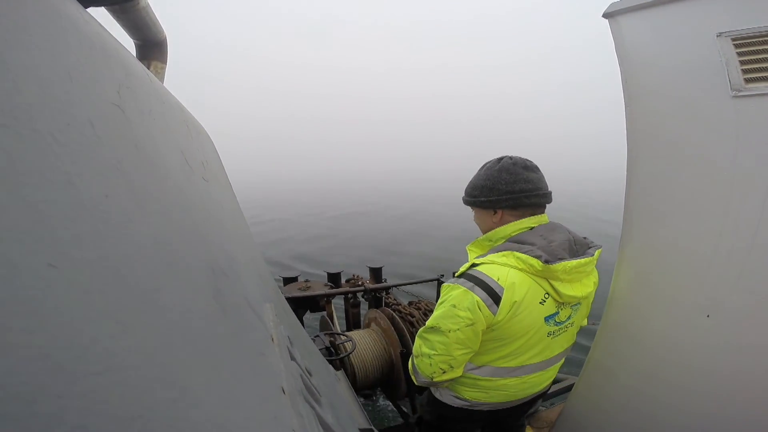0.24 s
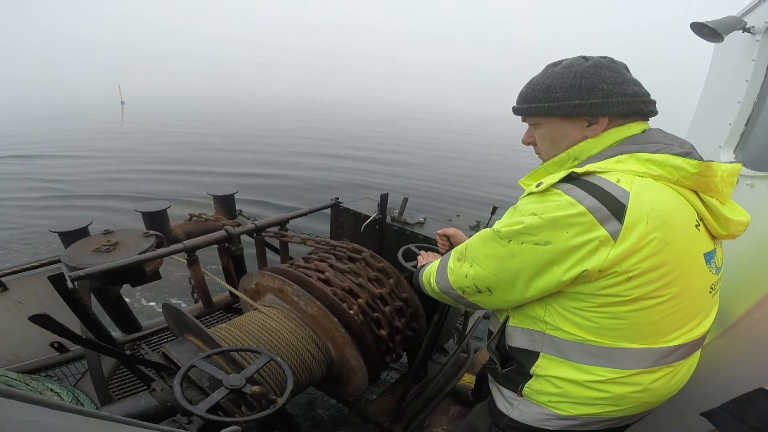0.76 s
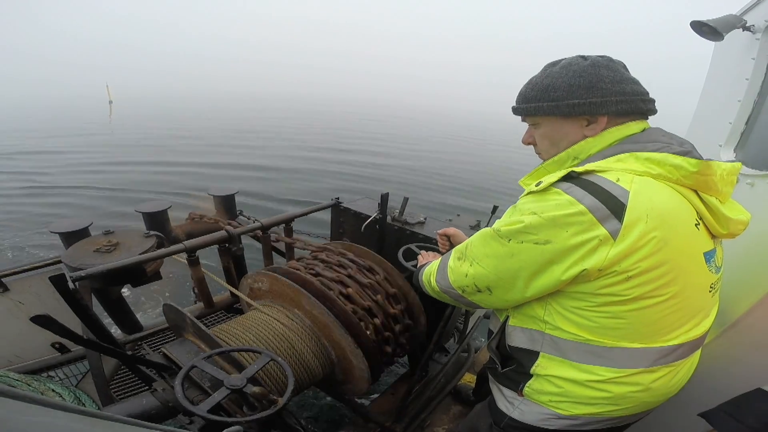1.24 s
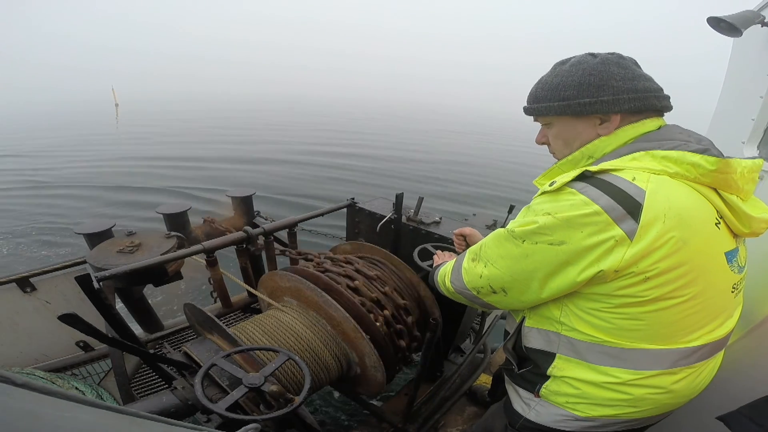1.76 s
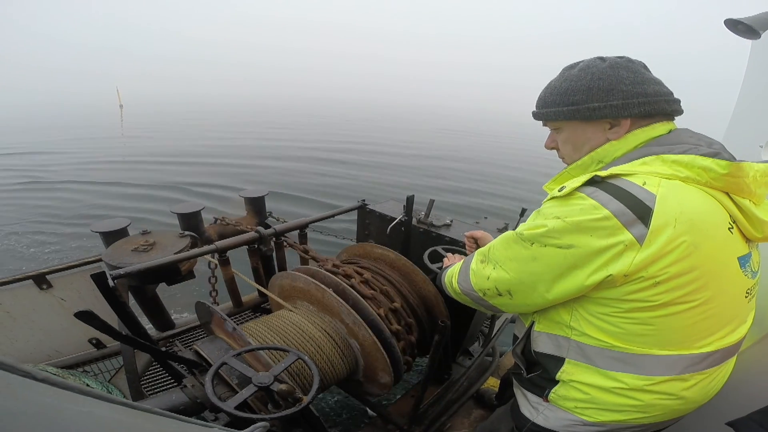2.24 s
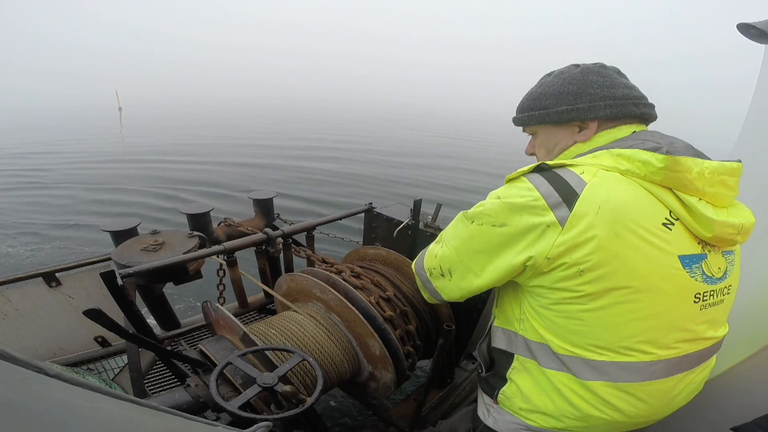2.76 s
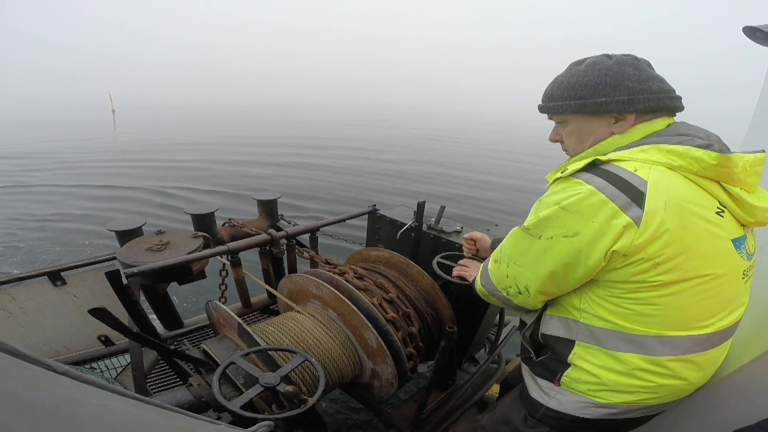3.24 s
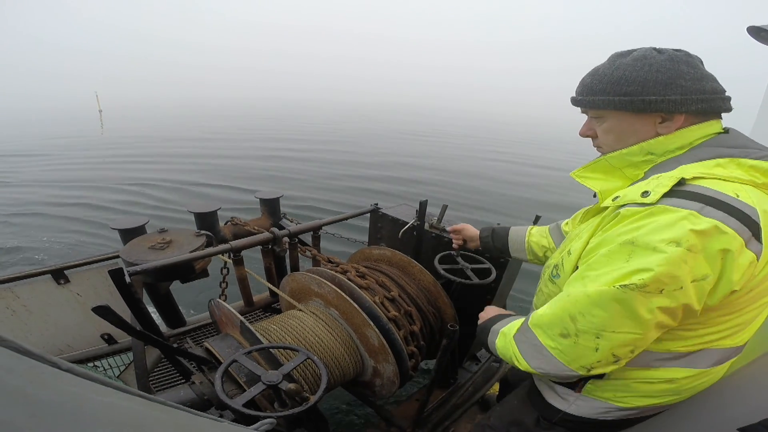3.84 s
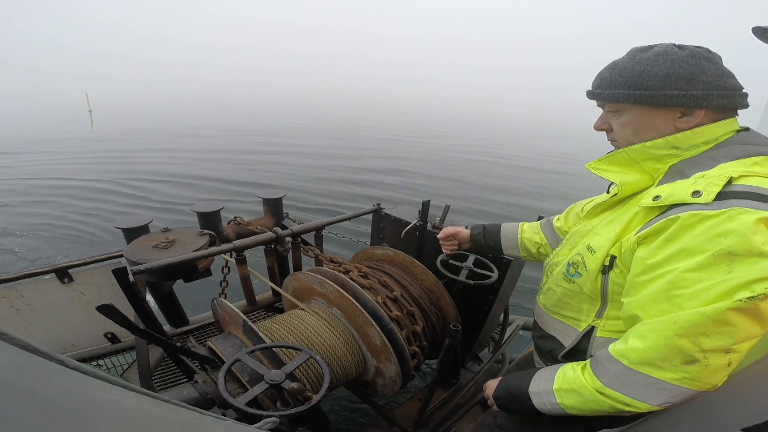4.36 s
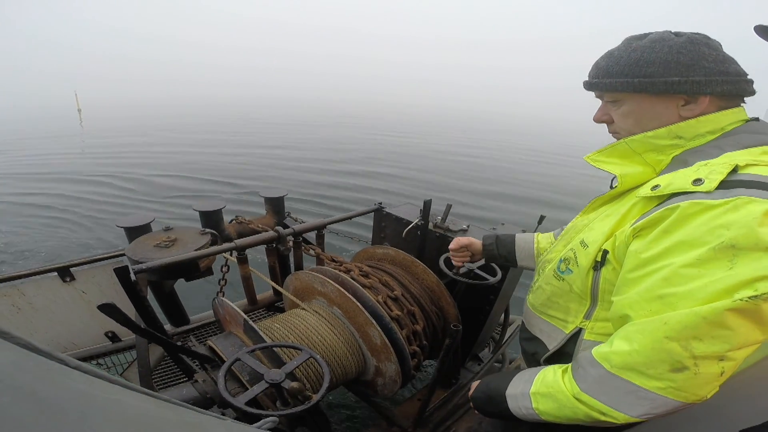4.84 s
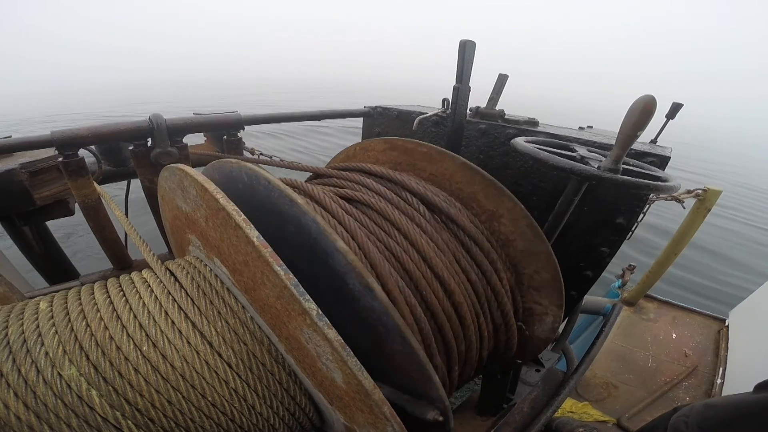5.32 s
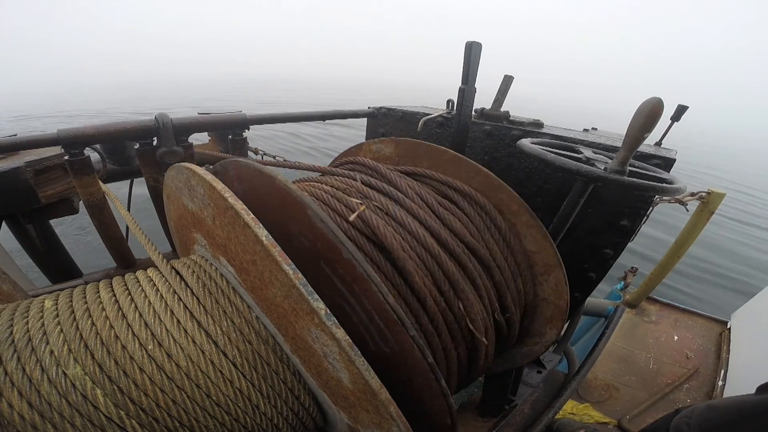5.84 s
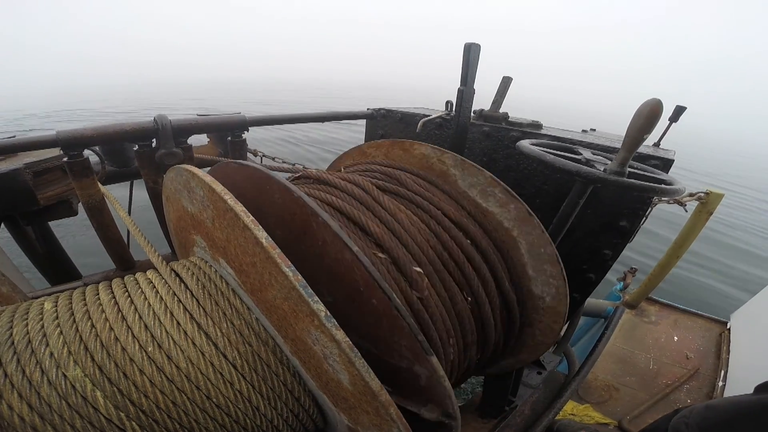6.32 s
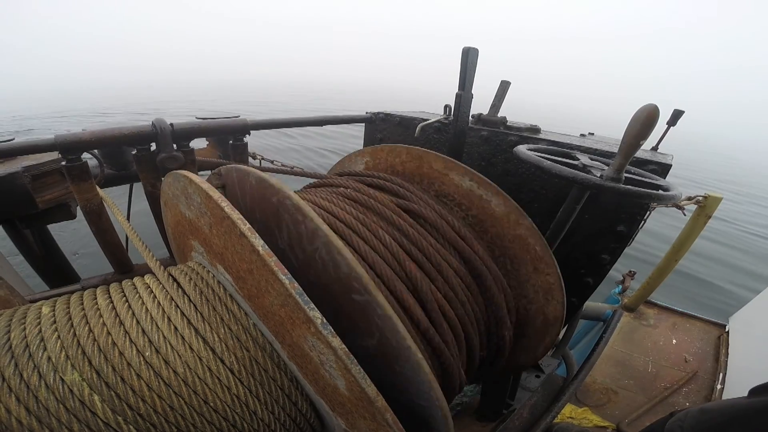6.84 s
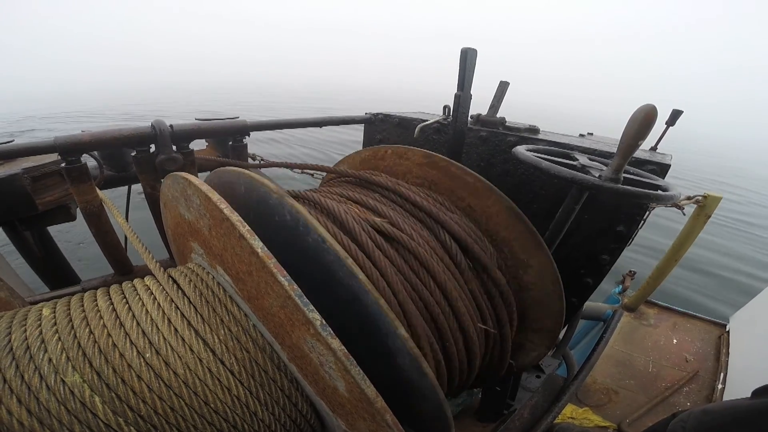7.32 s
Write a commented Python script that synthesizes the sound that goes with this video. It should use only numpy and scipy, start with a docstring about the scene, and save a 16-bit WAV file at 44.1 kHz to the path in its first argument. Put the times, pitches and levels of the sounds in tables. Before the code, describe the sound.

A loud metallic chain rattle slows and stops while an engine throbs and gears wind down, then a drum whines as it hauls wire rope.

```python
"""A work boat's deck winch, in four shots joined by hard cuts.
First, buffeting wind (shaped noise). Then chain clatters over the steel bow roller (struck modes and noise) and slows
to single links; the diesel throbs (firing-rate tones, pulsed noise) and gears whine (mesh tones), then coast down.
Next the drum hauls wire rope with a whine (stroke tones, ringing casing) and one rope tick.
Last, a quiet deck: faint low noise and one puff of wind."""
import sys
import numpy as np
from scipy import signal
from scipy.fft import rfft, irfft
from scipy.io import wavfile
from scipy.ndimage import uniform_filter1d

SR = 44100
rng = np.random.default_rng(int(sys.argv[2]) if len(sys.argv) > 2 else 0)


def master(y):
    """Save y as 16-bit WAV."""
    cut = np.clip(np.atleast_2d(y).T, -1, 1)
    pcm = np.round(cut * 32767)  # scale
    wavfile.write(sys.argv[1], SR, pcm.astype(np.int16))


N = 334719
T = np.arange(N) / SR

CHAIN_S, HAUL_S, DECK_S = 0.2968, 5.018, 7.417  # starts of shots 2, 3, 4
FIRING_HZ = 54.35  # mean rate
COAST_S = 3.66  # gears start to coast down

# heavy links striking the roller; levels relative to the trims in links():
# start_s, clink_rel_db, frame_ring_rel_db, crunch_rel_db, link_pitch_hz
HEAVY_LINKS = [(0.2962, -23, -14.5, -23.5, 4970), (0.3436, -20, -16, -23.5, 5770),
               (0.3815, -18.5, -12.5, -20.5, 5060), (0.4194, -21, -12.5, -28, 5150),
               (0.4788, -24, -11.5, -26.5, 5140), (0.5237, -18, -12.5, -19, 5570),
               (0.603, -22, -18.5, -33, 5040), (0.6504, -20.5, -17, -31.5, 5120),
               (0.7148, -22.5, -11, -33.5, 4920), (0.7372, -22.5, -8, -28, 5080),
               (0.7577, -24, -17.5, -27.5, 4930), (0.8155, -23.5, -11, -24, 5700),
               (0.8465, -28, -9, -24.5, 5170), (0.8871, -24.5, -11, -25.5, 5120),
               (0.9343, -18.5, -8.5, -21.5, 5144), (0.9767, -21.5, -14, -25, 5066),
               (1.0214, -18, -17, -23.5, 5080), (1.064, -18, -8.5, -17, 5070),
               (1.1119, -21.5, -15, -27, 5000), (1.1558, -23, -10.5, -26, 5000),
               (1.2096, -18.5, -14.5, -28, 4980), (1.2925, -19, -8.5, -28.5, 5040),
               (1.3409, -16, -9, -23.5, 4970), (1.381, -18, -12, -22, 4890),
               (1.4461, -22, -14, -28.5, 4940), (1.4805, -19, -11, -23, 5070),
               (1.5144, -24.5, -18, -17, 5000), (1.5474, -19.5, -14.5, -20, 4880),
               (1.5928, -17, -9, -21, 5740), (1.6287, -17, -10, -22, 5800),
               (1.702, -23.5, -18.5, -33, 5070), (1.9006, -24, -19.5, -31, 5060),
               (1.9679, -33, -25, -35, 5060), (2.0163, -21, -17, -27.5, 4970),
               (2.0872, -25.5, -16, -29, 5010), (2.1525, -25, -20, -29, 5870),
               (2.2626, -24.5, -19.5, -33, 5100), (2.3356, -23, -21, -33, 5060)]


def amp(db):
    """Decibels to gain."""
    return 10 ** (np.asarray(db) / 20)


def unit(x):
    """Scale to rms 1."""
    return x / np.sqrt(np.mean(x ** 2) + 1e-18)


def since(s):
    """Seconds gone by after time s; zero before it."""
    return np.maximum(T - s, 0)


def fade(t, t60):
    """A decay of 60 dB in t60 seconds."""
    return np.exp(-np.log(1000) * t / t60)


def curves(table):
    """Linear control curve for each column after the time."""
    s, *columns = np.transpose(table)
    return [np.interp(T, s, c) for c in columns]


def walk(rate_hz):
    """Slow random control of rms 1: rate_hz fresh draws a second, smoothed."""
    hold = max(int(SR / rate_hz), 2)
    steps = np.repeat(rng.standard_normal(N // hold + 1), hold)
    return unit(uniform_filter1d(steps, hold)[:N])


def colour(x, spectrum):
    """Shape a sound by (hz, rel_db) points, cut below half the lowest; rms 1."""
    hz, db = np.transpose(spectrum)
    f = np.fft.rfftfreq(len(x), 1 / SR) + 1e-9
    gain = amp(np.interp(np.log(f), np.log(hz), db)) * (f > hz[0] / 2)
    return unit(irfft(rfft(x) * gain, len(x)))


def resonate(x, peaks):
    """Sum of twice-run peak filters (hz, half_width_hz at -6 dB, rel_db); rms 1."""
    out = 0
    for hz, half_width_hz, db in peaks:
        b, a = signal.iirpeak(hz, hz / half_width_hz / 2, fs=SR)
        once = signal.lfilter(b, a, x)
        out = out + amp(db) * signal.lfilter(b, a, once)
    return unit(out)


def tones(turns, orders, waver):
    """Multiples (multiple, rel_db) of a turning shaft, each wavering in strength and phase; rms 1."""
    out = 0
    for multiple, db in orders:
        steady = np.cos(2 * np.pi * (multiple * turns + rng.random()))
        unsteady = walk(22) * np.cos(2 * np.pi * (multiple * turns + rng.random()))
        out = out + amp(db) * (steady + waver * unsteady)
    return unit(out)


def strokes(turns, depth):
    """Noise that surges once in every cycle."""
    return rng.standard_normal(N) * (1 + depth * np.exp(-4 * (turns % 1)))


def add(out, s, sound):
    """Mix a sound in at time s."""
    i = max(int(s * SR), 0)
    out[i:i + len(sound)] += sound[:N - i]


def chain_speed():
    """The chain's share of its full speed: braked to a crawl, then stopped."""
    # time_s, share_of_full_speed
    speed_points = [(1.66, 0.95), (1.77, .38), (2.4, .19)]
    stop_s = 2.42
    return curves(speed_points)[0] * (T < stop_s)


def chain_force():
    """How hard the chain is thrown about: its speed, scaled by every heave."""
    # start_s, length_s, gain_db
    heave_rows = [(0.3, 0.22, 1), (0.728, 0.25, 4.5), (1.06, 0.11, -1), (1.301, .12, 2.5),
                  (1.462, 0.16, 6.5)]
    attack_s, release_s = 0.027, 0.066  # linear rise; 1/e fall of the dB gain
    heave_db = 0
    for s, length_s, db in heave_rows:
        rise = np.clip(since(s) / attack_s, 0, 1)
        heave_db = heave_db + db * rise * np.exp(-since(s + length_s) / release_s)
    return chain_speed() * amp(heave_db)


def links(ring_db=-13.5, clink_db=-24, crunch_db=-13, crunch_t60=0.17, chatter_s=.027, landing=1.0,
          clink_hz=6280, clink_half_width_hz=300, clink_t60=0.019, sing_db=6, sing_growth=1.81, count=10):
    """A landing link clinks and crunches on rusty steel; neighbours chatter on the frame, hard blows sing."""
    ring_lag_s = .004  # at full speed the frame rings just after the clink, as the link settles
    out, t, speed = np.zeros(N), T[:SR // 6], chain_speed()
    for s, link_db, frame_db, rust_db, own_hz in list(HEAVY_LINKS) + light_links():
        blows = np.zeros(len(t))
        blows[(chatter_s * rng.random(count) * SR).astype(int)] = rng.uniform(-1, 1, count)
        blows[0] = landing
        ring = signal.fftconvolve(blows, frame_ring())[:len(t)]
        pitch_hz = clink_hz * rng.uniform(.975, 1.025)
        burst = rng.standard_normal(len(t)) * t * fade(t, clink_t60)
        clink = resonate(burst, [(pitch_hz, clink_half_width_hz, 0)])
        grit = rng.standard_normal(len(t)) ** 3 * fade(t, crunch_t60)  # cubed: sparse, spiky
        crunch = resonate(grit, [(3600, 900, 11), (4910, 81, 1), (6740, 400, -20.0)])
        add(out, s, amp(link_db + clink_db) * clink + amp(rust_db + crunch_db) * crunch)
        add(out, s, amp(sing_db + sing_growth * link_db) * singing(own_hz))
        add(out, s + ring_lag_s * speed[int(s * SR)], amp(frame_db + ring_db) * unit(ring))
    return out


def light_links(scatter_db=2.0, jitter=.12, clink_follows=0.22, crunch_db=-29, own_hz=5060):
    """Lighter links land between the heavy ones, further apart as the chain slows; rows as in HEAVY_LINKS."""
    gap_s, light_clink_db, light_frame_db = .031, -26.5, -19  # at full speed, before scatter and links() trims
    speed, force, rows = chain_speed(), chain_force(), []
    times = [row[0] for row in HEAVY_LINKS]
    for start, end in zip(times, times[1:]):
        mean_speed = speed[int(start * SR):int(end * SR)].mean()
        steps = max(round((end - start) * mean_speed / gap_s), 1)
        chance = rng.standard_normal((32, 3))
        for k, (late, hard, pitch) in zip(range(1, steps), chance):
            s = start + (end - start) * (k + jitter * late) / steps
            i = int(s * SR)
            pace_db, force_db = (20 * np.log10(c[i] + 1e-6) for c in (speed, force))
            clink_db = light_clink_db + pace_db + clink_follows * force_db + scatter_db * hard
            blow_db = force_db + scatter_db * hard
            pitch_hz = own_hz * (1 + .012 * pitch)
            rows.append((s, clink_db, light_frame_db + blow_db, crunch_db + blow_db, pitch_hz))
    return rows


def singing(hz, rise_s=0.001, split=.01, t60=0.14):
    """A free link rings on in a close, beating pair of modes."""
    t = T[:SR // 6]
    upper = np.sin(2 * np.pi * (hz * (1 + split) * t + rng.random()))
    pair = np.sin(2 * np.pi * hz * t) + .5 * upper
    return pair * fade(t, t60) * (1 - np.exp(-t / rise_s))


def frame_ring(clank_db=-1.5, clank_t60=0.094, spread_db=2):
    """One blow on the roller frame; each spot wakes the modes in its own mix, with a dense short clank."""
    # modes of the roller frame: mode_hz, rel_db, t60_s
    frame_modes = [(605, -25, .12), (900, -23, .1), (1380, -16, .07), (1703, -14, .18), (1938, -5, .13),
                   (2072, -7, .15), (2213, -3, .14), (2258, -5, .11), (2312, 1, .15), (2383, -4, .09),
                   (2503, -7, .16), (2640, -10, .12), (2737, -8, .11), (2835, -11, .17), (3190, -13, .09),
                   (3760, -16, .05), (4110, -19, .07), (5040, -17, .08), (5780, -22, .08), (6130, -21, .07)]
    # dense ring of a blow: hz, rel_db
    clank_spectrum = [(150, -38.5), (400, -22.5), (900, -9.5), (1150, -1.5), (1400, -2), (2300, 15),
                      (3050, -1), (4200, -15), (5400, -14.5), (6400, -12.5), (7200, -15.5), (8200, -30),
                      (8900, -46.5)]
    t = T[:SR // 6]
    hz, db, t60 = np.transpose(frame_modes)[:, :, None]
    gain = amp(db + spread_db * rng.standard_normal(hz.shape))
    waves = np.sin(2 * np.pi * (hz * t + rng.random(hz.shape)))
    modes = (gain * fade(t, t60) * waves).sum(0)
    clank = colour(rng.standard_normal(len(t)), clank_spectrum) * fade(t, clank_t60)
    return unit(modes) + amp(clank_db) * unit(clank)


def jostle(level_db=-28.0, dull_clank_db=-8, knocks_per_s=45, scatter_db=3.0, count=10):
    """Small knocks all along the moving chain keep the frame ringing between links; they weaken as it slows."""
    out, force = 0, chain_force()
    for _ in range(count):  # each spot has its own knocks and ring
        knocks = (rng.random(N) < knocks_per_s / SR) * amp(scatter_db * rng.standard_normal(N))
        out = out + signal.oaconvolve(knocks * force, frame_ring(clank_db=dull_clank_db))[:N]
    return unit(out) * amp(level_db)


def hauling(tone_db=-1, ring_db=-4):
    """Under load the drive's strokes ring its casing into a beating whine, which eases and slows at the end."""
    # tones of the loaded drive: multiple_of_stroke_rate, rel_db
    haul_tones = [(1.5, -11.5), (3, -17.5), (4, -14), (6, -14), (7, -8), (8, -32.5), (9, -14.5),
                  (10, -12.5), (11, -20), (15, -11), (19.4, -28), (20.4, -14.5), (24, -18), (25, -3),
                  (25.6, -6), (26, 2.5), (30.1, -9), (31.5, -16.5), (123, -35)]
    # noise of the loaded drive: hz, rel_db
    haul_noise = [(25, 4.5), (60, 1), (120, -1.5), (260, -3), (400, -2), (780, -0.5), (1000, -4),
                  (1300, 0.5), (1660, 5), (1760, -4.5), (2600, -10.5), (4000, -19), (5200, -26),
                  (7400, -34), (8500, -44.5)]
    # ringing of the casing: hz, half_width_hz, rel_db
    casing_peaks = [(1313, 63, 0.5), (2370, 110, -14.5), (2940, 52, -16), (3430, 86, -23), (5170, 120, -28)]
    stroke_hz, whine_db, noise_db = 50.65, -38.5, -41
    ease_s, ease_db_per_s = 6.34, 2.5
    sag_s, sag_hz_per_s = 6.7, 1.6
    hz = stroke_hz - sag_hz_per_s * since(sag_s)
    level_db = whine_db - ease_db_per_s * since(ease_s)
    turns = np.cumsum(hz * (1 + 0.002 * walk(15))) / SR
    tonal = amp(tone_db) * tones(turns, haul_tones, waver=0.25)
    ringing = amp(ring_db) * resonate(strokes(turns, depth=0.64), casing_peaks)
    noise = colour(strokes(turns, depth=0.34), haul_noise)
    return amp(level_db) * (tonal + ringing) + amp(noise_db) * noise


def rope_tick(s=7.059, tick_db=-55, tick_t60=0.08):
    """A turn of wire rope slips into place on the drum: a decaying burst of resonant noise."""
    noise = resonate(rng.standard_normal(N), [(3600, 900, -2), (6150, 910, 0)])
    return amp(tick_db) * (T > s) * fade(since(s), tick_t60) * noise


def gears(hum_db=0, whine_db=2, swell=0.34, whine_hz=1303, whine_half_width_hz=30):
    """Gears hum; at full speed one tone hits a resonance and whines, swelling at a third of mean firing rate."""
    # tones of the gear mesh: multiple_of_mesh_rate, rel_db
    gear_tones = [(4, -3.5), (6, -13), (7, -1), (8, -3.5), (8.3, -3), (10, -0.5), (12, -3.5), (13, -8.5),
                  (14, -3), (15, -6), (19, -9.5)]
    mesh_hz, coast_hz_per_s = 73.55, 12
    gear_db, fade_db_per_s = -42.5, 8  # dies away as they coast
    load_db = -4  # the whine is weaker while the chain moves
    multiple = 17.77  # of the mesh rate, for the whine
    hz = mesh_hz - coast_hz_per_s * since(COAST_S)
    level_db = gear_db - fade_db_per_s * since(COAST_S)
    turns = np.cumsum(hz * (1 + 0.0011 * walk(9))) / SR
    in_tune = 1 / (1 + ((multiple * hz - whine_hz) / whine_half_width_hz) ** 2)
    cycle = np.sin(2 * np.pi * FIRING_HZ / 3 * T)
    whine_gain = in_tune * amp(load_db * (chain_speed() > 0)) * (1 + swell * cycle)
    whine = whine_gain * tones(turns, [(multiple, 0)], waver=0.32)
    hum = tones(turns, gear_tones, waver=0.21)
    return amp(level_db) * (amp(hum_db) * hum + amp(whine_db) * whine)


def machinery(throb_db=-.5, rumble_db=-44, clatter_db=3.0, housing_db=-1):
    """The diesel throbs, rumbles, clatters and shakes the gear housing; louder under chain, softer in coasting."""
    # the exhaust's throb swells and sinks: time_s, rel_db (trimmed by throb_db)
    throb_points = [(0.35, -53.5), (0.53, -27), (0.76, -44), (0.91, -37), (1.26, -43), (1.85, -33.5),
                    (3.77, -34), (4.23, -51), (4.44, -38), (4.48, -52), (4.7, -37), (5.0, -42)]
    # clatter of the running machinery: hz, rel_db
    clatter_spectrum = [(25, -4), (60, -2), (135, 2), (190, -4), (450, -2), (1100, -7), (1500, 1),
                        (2500, -6.5), (2700, -14), (4150, -16.5), (5300, -28.5), (6800, -34), (8500, -52.5)]
    # ringing of the gear housing: hz, half_width_hz, rel_db
    housing_peaks = [(542, 9.9, -8.5), (609.4, 40, -1), (740.4, 33, -6), (886, 50, -2.5), (1294, 51, 1.5),
                     (1382, 58, 1.5), (1588, 150, -8.5), (1710, 26, -16), (1926, 70, -11.5),
                     (2210, 96, -6.5), (2420, 29, -13), (3320, 90, -16), (4100, 140, -16),
                     (5200, 160, -21.5)]
    free_db, chain_load_db = -39, 2  # running free, before trims; added at full chain speed
    coast_drop_db, coast_fade_s = -4, 0.63
    exhaust_db, = curves(throb_points)
    coasted = np.minimum(since(COAST_S) / coast_fade_s, 1)
    effort_db = free_db + chain_load_db * chain_speed() + coast_drop_db * coasted
    turns = np.cumsum(FIRING_HZ * (1 + .0015 * walk(14))) / SR
    throb = tones(turns, [(2 / 3, -19), (1, 0), (4 / 3, -20), (2, -17)], waver=0.14)
    rumble = amp(rumble_db) * resonate(rng.standard_normal(N), [(46.6, 21, 0)])
    clatter = amp(clatter_db) * colour(strokes(turns, depth=0.3), clatter_spectrum)
    housing = amp(housing_db) * resonate(strokes(turns / 3, depth=0.96), housing_peaks)
    return amp(exhaust_db + throb_db) * throb + rumble + amp(effort_db) * (clatter + housing)


def bow_wind(level_db=-27, gust_db=1.0):
    """Wind buffets the microphone: low-heavy noise of randomly drifting level."""
    # hz, rel_db
    bow_spectrum = [(12, -31), (20, 0), (81, -7), (340, -27), (652, -24.5), (1050, -32.5), (1130, -28.5),
                    (2280, -31.5), (8000, -62.5), (10400, -97), (17600, -120)]
    return amp(level_db + gust_db * walk(12)) * colour(rng.standard_normal(N), bow_spectrum)


def quiet_deck(gust_db=-41, air_db=-46):
    """Faint rumble of the boat as low-heavy noise, with one puff of wind on the microphone."""
    # hz, rel_db
    deck_spectrum = [(12, -23.5), (20, 1), (86, -12.5), (125, -24.5), (859, -28), (8000, -52.5),
                     (10400, -85.5), (17600, -120)]
    swell = np.interp(T, [7.41, 7.44, 7.48], [.4, 1, 0])
    puff = swell * resonate(rng.standard_normal(N), [(27.0, 5.2, 0)])
    return amp(air_db) * colour(rng.standard_normal(N), deck_spectrum) + amp(gust_db) * puff


def scene():
    """The four shots, joined by hard cuts."""
    chain_shot = links() + jostle() + machinery() + gears()
    haul_shot = hauling() + rope_tick()
    shots = [bow_wind(), chain_shot, haul_shot]
    return np.select([T < CHAIN_S, T < HAUL_S, T < DECK_S], shots, quiet_deck())[None]


def record(dry, dull_hz=7900, top_hz=8800):
    """The camera's case colours the sound in series peaks and dulls it; the top is cut steeply."""
    # colour of the case: hz, width_hz, gain_db
    case_peaks = [(1785, 137, -6), (2110, 40, -19.5), (3060, 21, -3.5), (4840, 83, 5.5), (5850, 55, 6.5)]
    for hz, width_hz, db in case_peaks:
        b, a = signal.iirpeak(hz, hz / width_hz, fs=SR)
        dry = dry + (amp(db) - 1) * signal.lfilter(b, a, dry)
    dry = signal.sosfilt(signal.butter(10, dull_hz, fs=SR, output="sos"), dry)
    return signal.sosfilt(signal.ellip(10, .2, 80, top_hz, fs=SR, output="sos"), dry)


dry = scene()
out = record(dry)
master(out)
```